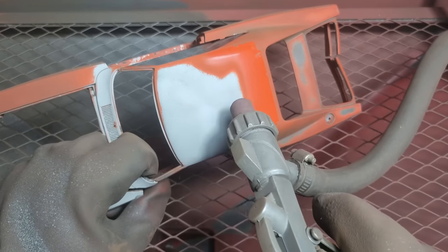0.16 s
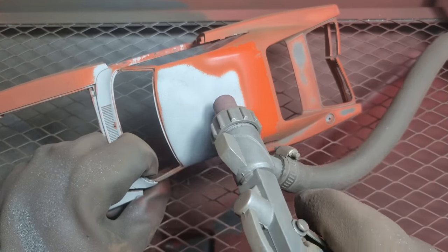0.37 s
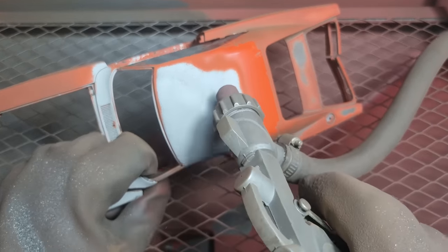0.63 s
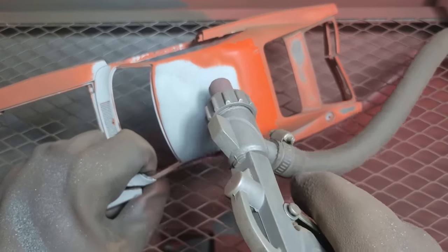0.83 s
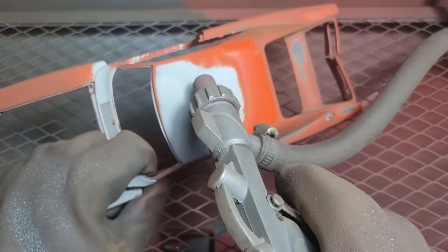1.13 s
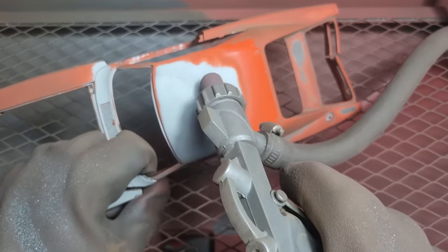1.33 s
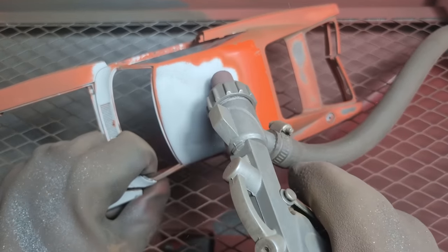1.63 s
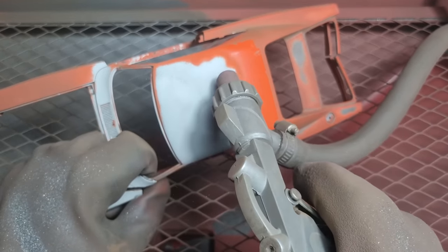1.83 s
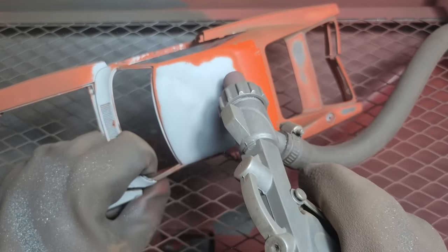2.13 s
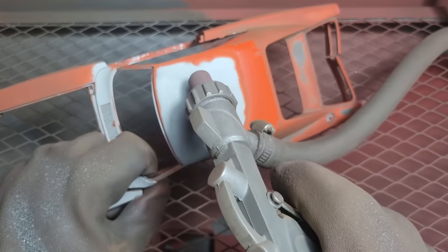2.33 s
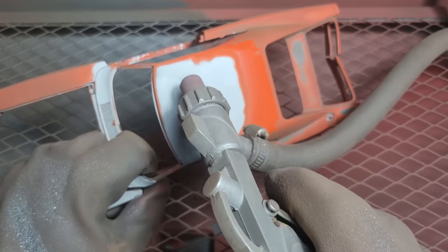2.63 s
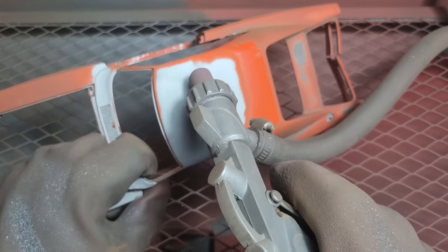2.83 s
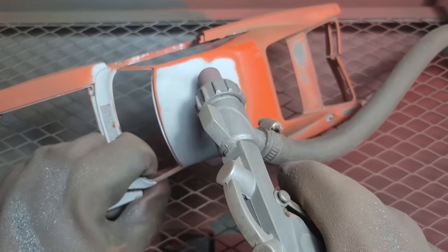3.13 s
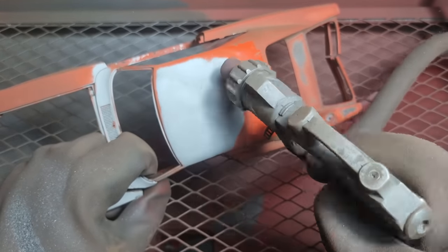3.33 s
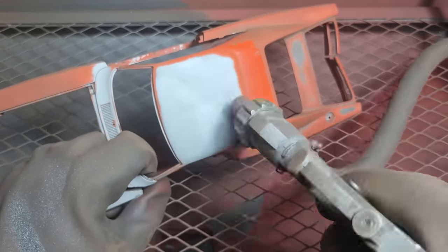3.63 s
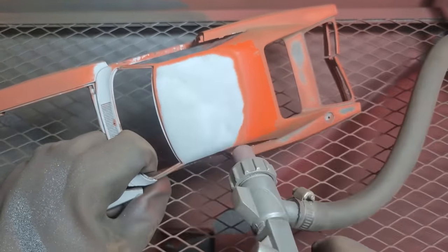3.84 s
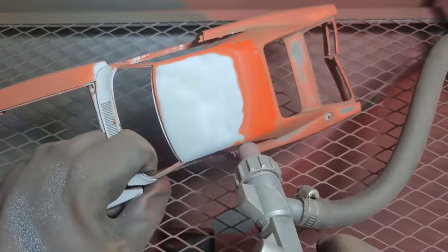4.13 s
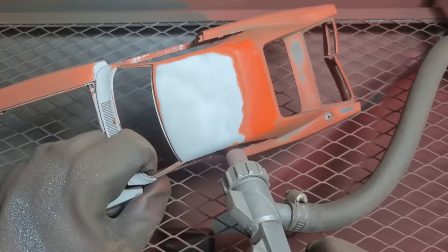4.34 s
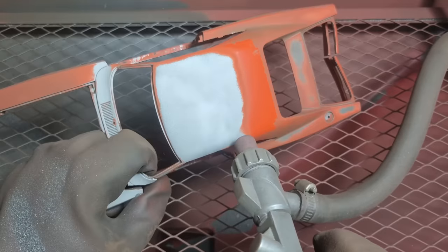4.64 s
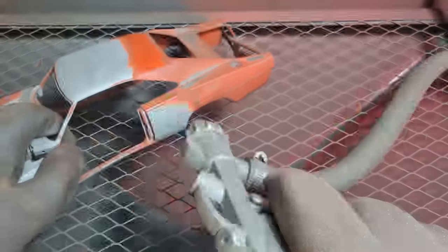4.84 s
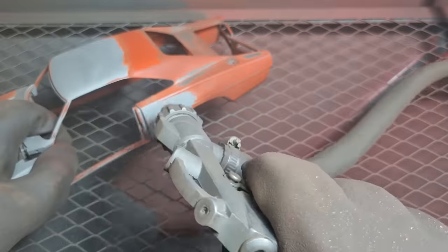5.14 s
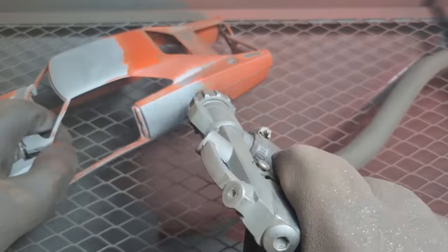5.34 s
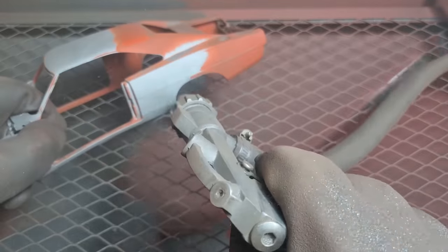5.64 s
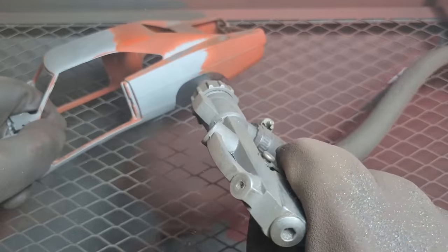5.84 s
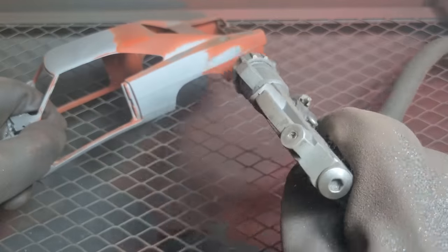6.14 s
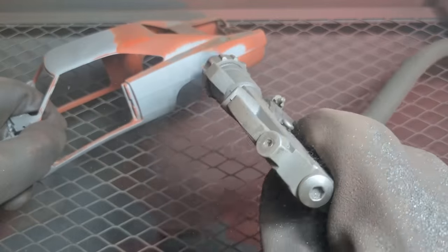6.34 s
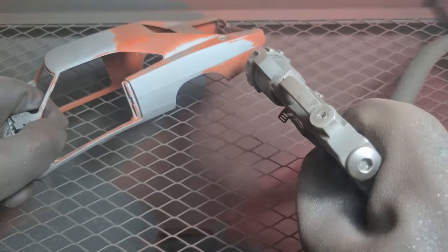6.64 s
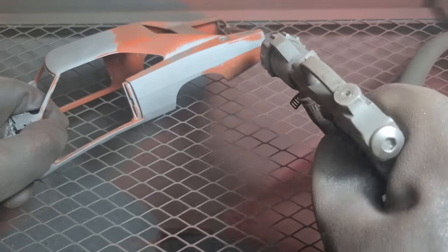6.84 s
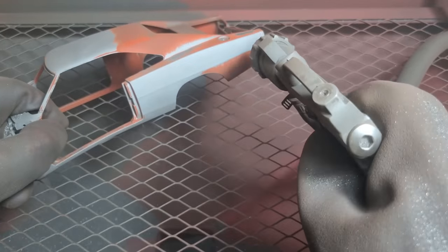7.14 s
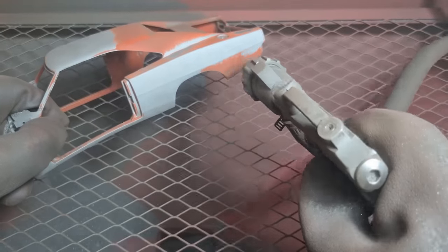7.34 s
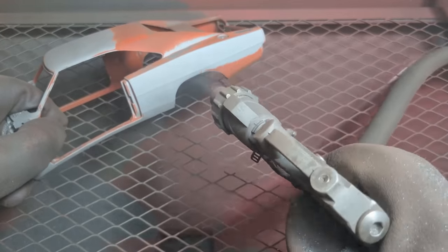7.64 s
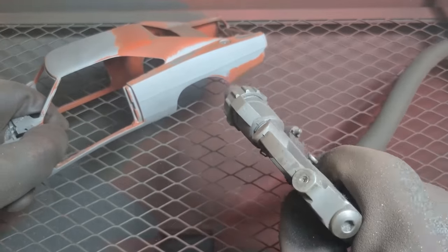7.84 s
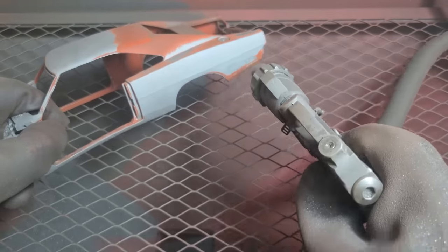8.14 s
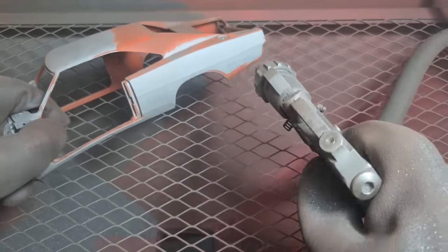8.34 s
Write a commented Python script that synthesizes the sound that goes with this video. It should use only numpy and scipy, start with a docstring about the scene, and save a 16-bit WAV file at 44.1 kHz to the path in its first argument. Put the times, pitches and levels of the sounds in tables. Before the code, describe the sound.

Steady sandblasting hiss and fine gritty fizz over a motor hum, dipping briefly midway and returning stronger, with faint whistles.

```python
"""A hiss over a humming fan and a throbbing compressor: a blast gun strips paint from a small metal shell
in a sandblasting cabinet, first its roof, then, after a brief lull, its flank. The turbulent jet excites
the resonances of the steel box, sings in the shell's hollows and whistles over edges, while grit impacts
merge into a fizz. The compressor runs through the first pass and again at the very end; its load makes
the fan's hum sag in pitch and level."""
import sys
import numpy as np
from scipy import signal
from scipy.fft import rfft, irfft
from scipy.io import wavfile
from scipy.ndimage import uniform_filter1d

SR = 44100
rng = np.random.default_rng(int(sys.argv[2]) if len(sys.argv) > 2 else 0)


def log_audio(samples):
    """Write samples as a 16-bit WAV file to the path given in sys.argv[1]."""
    # one column per channel
    frames = np.atleast_2d(samples).T
    # limit to full scale, then quantise
    limited = np.clip(frames, -1, 1)
    pcm = np.round(limited * 32767).astype(np.int16)
    wavfile.write(sys.argv[1], SR, pcm)


N = 373968
T = np.arange(N) / SR
HZ = np.fft.rfftfreq(N, 1 / SR)
LULL_START_S, PASS_CHANGE_S, LULL_END_S = 4.808, 4.835, 4.88
HISS_LULL_DB, HUM_LULL_DB, RUMBLE_LULL_DB = -11.5, -22, -15

# Coherence of the sound field. Each row: frequency in Hz, left-right likeness from 0 to 1.
COHERENCE = [(60, 0.92), (130, 0.89), (290, 0.9), (430, 0.71), (700, 0.054), (1400, 0.054), (3000, 0.28),
             (15000, 0.26)]
# Strength of the blast. Each row: time in seconds, relative jet level in dB, relative grit level in dB.
STREAM = [(0, -46.5, -57.5), (1.4, -46, -55), (2.2, -46.5, -56), (3.2, -46, -54.9), (4.15, -46, -55.5),
          (4.42, -44.5, -54), (4.58, -47.5, -56.5), (4.8, -47, -54.8), (4.95, -44, -51.5),
          (5.1, -45, -49.5), (6.3, -45.5, -49), (6.6, -44.5, -51), (7.45, -45, -50.5), (7.68, -45.5, -52),
          (7.95, -45, -51), (8.48, -44.5, -51)]
# Jet spectrum, one table a pass. Each row: frequency in Hz, relative spectral density in dB.
JET_COLOUR = [
    [(500, -14), (1100, -29), (1800, -16), (2800, -7), (4000, -3.5), (5200, -4), (6100, -6.5), (7000, -4.5),
     (7800, -5.5), (8600, -12), (10000, -29), (16000, -55)],
    [(500, -12.5), (1100, -13.5), (1550, -15.5), (2200, -9.5), (2600, -8), (4100, -1.5), (5200, -3.5),
     (6100, -7.5), (7000, -4), (7800, -10.5), (8600, -12.5), (10000, -56), (16000, -64)],
]
# Cabinet resonances in the hiss, one table a pass. Each row: frequency in Hz, width in Hz, gain in dB.
CABINET_MODES = [
    [(1612, 30, 15), (2190, 68, 10), (2870, 25, 6.5), (3380, 31, 5.5), (4100, 60, 5.5), (5390, 120, 2.5),
     (6470, 130, 3.5), (7870, 68, -3)],
    [(1340, 75, 11.5), (2070, 40, 8), (2960, 46, 5), (4030, 110, 1.5), (5270, 64, 5), (6440, 56, 8.5),
     (7800, 220, 3.5)],
]
# Direction of the hiss. Each row: frequency in Hz, multiplier of the jet's left-right level difference.
JET_SIDE = [(1000, 0), (2000, 0.5), (3500, 0.68), (5500, 1.37), (7600, 1.14), (8400, 0.33)]
# Spectrum of the grit impacts. Each row: frequency in Hz, relative spectral density in dB.
GRIT_COLOUR = [(2000, -42), (7000, 1.5), (9000, -2.5), (10800, -3), (12500, 0.5), (14000, -0.5), (15500, 2),
               (17000, -3)]
# The fan tone before any sag. Each row: time in seconds, frequency in Hz.
FAN_PITCH = [(5.53, 544.4), (5.6, 546.7), (7.4, 545.5)]
# Direction of the hum. Each row: time in seconds, left level over right in dB.
HUM_SIDE = [(0.0, -1.5), (0.54, 0.5), (2.76, -2.0), (2.83, 3), (4.75, 2.5), (5.05, 11.5), (5.86, 4.5),
            (7.56, 10), (7.63, 4.5), (8.22, 11), (8.27, -2), (8.31, 9), (8.48, 5.0)]
# Brief dips and swells of the hum. Each row: time in seconds, change in dB, half length in seconds.
HUM_SWELLS = [(2.74, -1.5, 0.065), (4.42, -2.5, 0.065), (4.89, 3.5, 0.013), (6.45, -1, .06),
              (7.68, -2.5, 0.095), (8.255, -3.5, 0.018)]
# Compressor runs. Each row: start and end in seconds, drive in dB, fan sag in Hz, hum drop in dB,
# level of the airy ring in dB.
COMPRESSOR_RUNS = [(-.1, 4.83, -41.7, 7.9, 10.2, -66), (8.235, 8.6, -39, 5.8, 5.5, -50.5)]
# Modes of the compressor's body and pipes. Each row: frequency in Hz, width in Hz, relative level in dB.
PIPE_MODES = [(76, 22, -13), (164, 17, -8), (245.7, 8, -0.5), (326.4, 24.5, -2.5), (395.6, 18.2, 1.5),
              (486, 48, -16), (726.5, 16, -5.5), (796, 59, -19.5)]
# Air rumbling in the box, one table a pass. Each row: frequency in Hz, relative spectral density in dB.
RUMBLE_COLOUR = [
    [(10, -14), (30, -11), (60, -14.5), (105, -16), (200, -7), (275, -1.5), (380, -11), (450, -9),
     (580, -5), (680, -6.5), (870, -13.5), (1200, -11), (2000, -11.5), (5000, -21)],
    [(10, -30), (30, -20), (60, -8), (105, -15.5), (200, -3.5), (300, 2), (380, -1.5), (450, -2.5),
     (580, 3.5), (680, -8.5), (900, -3.5), (1200, -8), (2000, -4.5), (5000, -25.5)],
]
# Box resonances in the rumble, one table a pass. Each row: frequency in Hz, width in Hz, gain in dB.
RUMBLE_MODES = [
    [(944, 65, 7), (1017, 43, 7), (1280, 110, 4), (1550, 61, -1.5), (1612, 28, 7.5)],
    [(300, 8.6, 6.5), (376, 22, 8.5), (738, 44, 6), (820, 79, 0.5), (1004, 27, 9.5), (1550, 180, -3.5)],
]
# Strength of the rumble. Each entry: level of one pass in dB.
RUMBLE_DB = [-47.5, -45]
# Notes of the shell's hollows. Each row: start and length in seconds, pitch in Hz, level in dB.
HOLLOWS = [(-.1, .36, 3760, -56), (.95, 2.3, 4680, -59.5), (1.3, .95, 3780, -58), (1.25, 1.05, 6500, -56),
           (2.5, 1.2, 6490, -58), (5.09, .11, 6650, -54), (5.36, .15, 7750, -53), (5.96, .1, 6640, -54),
           (6.28, .22, 7770, -54.5), (7.55, .22, 5150, -54), (7.95, .4, 2920, -57)]
# Dull handling bumps. Each row: start and length in seconds, centre in Hz, level in dB.
BUMPS = [(.21, .18, 58, -51), (1.19, .16, 80, -53), (5.06, .16, 90, -53), (5.07, .14, 175, -55),
         (5.46, .22, 125, -58), (5.6, .19, 80, -46), (5.86, .14, 110, -57), (7.01, .12, 70, -57)]
# Rushes of air. Each row: start and length in seconds, centre and nominal width in Hz, level in dB.
RUSHES = [(4.28, .22, 7900, 2200, -53), (4.9, .05, 4500, 2600, -51), (5.58, .15, 3800, 1700, -55),
          (5.78, .18, 4200, 2200, -54), (7.53, .28, 3800, 2200, -45.5)]
# Edge whistles. Each row: start and length in seconds, level in dB before the lull lowers it.
WHISTLES = [(4.849, 0.078, -49), (5.56, .09, -53), (5.653, 0.097, -50.5), (5.77, 0.087, -51.5),
            (5.86, 0.33, -54), (6.42, 0.15, -53), (6.76, .06, -58), (8.18, 0.097, -51)]
# Stutters of the grit feed. Each row: time in seconds, drop of the fizz in dB, half length in seconds.
STUTTERS = [(4.99, 4, .01), (5.21, 6, .013), (5.35, 5.5, .013), (5.5, 5, .011), (5.718, 7.5, .015),
            (5.933, 6, .012), (6.12, 5.5, .012), (6.3, 3.5, .01)]


def gain_of(db):
    """Amplitude ratio of a level in decibels."""
    return 10 ** (np.asarray(db) / 20)


def unit_rms(x):
    """The signal scaled to an rms of 1."""
    return x / np.sqrt(np.mean(x ** 2) + 1e-20)


def spectrum(points):
    """A curve interpolated on a log-frequency axis."""
    hz, value = np.transpose(points)
    return np.interp(np.log(HZ + 1), np.log(hz + 1), value)


def follow(rows):
    """The columns of a time curve, interpolated at every sample."""
    times, *columns = np.transpose(rows)
    return [np.interp(T, times, column) for column in columns]


def bell(centre, width):
    """Resonance curve: 1 at its centre and 3 dB down half a width to either side."""
    return 1 / (1 + ((HZ - centre) / (.78 * width)) ** 2)


def resonant_gain(colour, modes):
    """Source and filter: the decibels of the resonances add to those of the source spectrum."""
    return gain_of(spectrum(colour) + sum(db * bell(hz, width) for hz, width, db in modes))


def waver(rate_hz):
    """Low-pass random fluctuation with an rms of 1."""
    return unit_rms(irfft(rfft(rng.standard_normal(N)) * bell(0, rate_hz), N))


def air(echo_share=.55, echo_spread_hz=70):
    """Partly coherent left and right noise spectra: alike in the bass, scrambled by the walls above."""
    left, other = rfft(rng.standard_normal((2, N)))
    same = spectrum(COHERENCE)
    knots = np.arange(0, SR / 2 + echo_spread_hz, echo_spread_hz)
    phase = np.interp(HZ, knots, np.cumsum(rng.uniform(-np.pi, np.pi, len(knots))))
    reflected = echo_share * np.minimum(HZ / 1000, 1) ** 2
    other = reflected * left * np.exp(1j * phase) + np.sqrt(1 - reflected ** 2) * other
    return np.array([left, same * left + np.sqrt(1 - same ** 2) * other])


def coloured(spectra, gain):
    """Filtered stereo noise, scaled so that the mean of its two sides has an rms of 1."""
    x = irfft(spectra * gain, N)
    return x / x.mean(0).std()


def panned(db):
    """Left and right gains with a mean of 1, the left db above the right."""
    ratio = gain_of(db)
    return 2 * np.array([ratio, np.ones_like(ratio)]) / (1 + ratio)


def gate(start, end, attack, release):
    """A window from start to end with linear ramps inside it."""
    return np.clip(np.minimum((T - start) / attack, (end - T) / release), 0, 1)


def swell(start, length, edge=.28):
    """A window with raised-cosine ramps, each lasting the fraction edge of its length."""
    return np.sin(np.pi / 2 * gate(start, start + length, length * edge, length * edge)) ** 2


def blips(rows):
    """Brief Gaussian changes of level, in decibels."""
    return sum(db * np.exp(-((T - time) / half) ** 2) for time, db, half in rows)


def spectral_ripple(x, depth_db, flare_db, hold_frames=26):
    """Narrow random peaks and dips drift through the hiss and fizz; wider bands flare briefly."""
    frames = signal.stft(x, nperseg=2048)[2]  # axes: side, frequency, time
    narrow, wide = rng.standard_normal((2, *frames.shape))
    narrow = narrow + .35 * narrow[::-1]  # the two sides share part of the pattern
    narrow = uniform_filter1d(uniform_filter1d(narrow, size=2, axis=1), size=hold_frames, axis=2)
    narrow = uniform_filter1d(narrow, size=5, axis=2)
    wide = uniform_filter1d(uniform_filter1d(wide, size=9, axis=1), size=5, axis=2)
    field_db = depth_db * unit_rms(narrow) + flare_db * unit_rms(wide)
    rippled = signal.istft(frames * gain_of(field_db), nperseg=2048)[1][:, :N]
    return rippled * x.std() / rippled.std()


def jet(trim_db=-.2, side_db=6, flutter_db=.62, feed_share=.36):
    """Turbulence makes broadband noise that the cabinet filters; the shell's pose changes each pass."""
    noise, flow_db = air(), follow(STREAM)[0]
    sides = panned(side_db * spectrum(JET_SIDE))
    passes = [coloured(noise, sides * resonant_gain(colour, modes))
              for colour, modes in zip(JET_COLOUR, CABINET_MODES)]
    hiss = spectral_ripple(np.where(T < PASS_CHANGE_S, *passes), depth_db=3.2, flare_db=1)
    return hiss * gain_of(trim_db + flow_db + flutter_db * waver(5.3) + feed_share * feed_stutter())


def grit(trim_db=2.5, flutter_db=.6):
    """Superposition: countless impacts of grains on metal merge into a continuous fine fizz."""
    flow_db = follow(STREAM)[1]
    fizz = coloured(air(), gain_of(spectrum(GRIT_COLOUR)))
    fizz = spectral_ripple(fizz, depth_db=3.7, flare_db=1.5)
    return fizz * gain_of(trim_db + flow_db + flutter_db * waver(14) + feed_stutter())


def compressor_state(switch_s=.02):
    """Switching of the load: on (0 to 1), drive gain, fan sag in Hz, hum drop in dB, ring gain."""
    return sum(np.outer([1, gain_of(db), sag_hz, drop_db, gain_of(ring_db)],
                        gate(start, end, switch_s, switch_s))
               for start, end, db, sag_hz, drop_db, ring_db in COMPRESSOR_RUNS)


def fan_hum(level_db=-27.5, calm_shake=.024, load_shake=.034, drift_db=.3):
    """Rotation gives one tone; under the compressor's load it sags, weakens and shakes more."""
    on, _, sag_hz, drop_db, _ = compressor_state()
    hz = follow(FAN_PITCH)[0] - sag_hz + .2 * waver(1)
    db = level_db - drop_db + blips(HUM_SWELLS) + drift_db * waver(1.8)
    phase = 2 * np.pi * np.cumsum(hz) / SR
    lag = (.19 + .85 * on) * np.array([[0], [1]])  # radians by which the right side trails
    shake = (calm_shake + load_shake * on) * (waver(30) + 1j * waver(30))  # in amplitude and phase
    tone = np.sqrt(2) * ((1 + shake) * np.exp(1j * (phase - lag))).real
    interference = np.cos(lag[1] / 2)  # gain of the mean of two tones out of step
    return tone * panned(follow(HUM_SIDE)[0]) * gain_of(db) / interference


def compressor(stroke_hz=11.7, boom_hz=173, wander_hz=3.39, boom_db=-6, pipes_db=-2.5, ring_hz=1020):
    """Piston strokes modulate a booming note's amplitude; airflow excites pipe modes and an airy ring."""
    _, drive, _, _, ring_gain = compressor_state()
    strokes = np.cumsum(stroke_hz + .4 * waver(3)) / SR
    throb = 1 + .4 * np.cos(2 * np.pi * strokes) + .07 * waver(10)
    cycles = np.cumsum(boom_hz + wander_hz * waver(13.2)) / SR
    boom = unit_rms(throb * np.sin(2 * np.pi * cycles)) * gain_of(boom_db) * panned([-4])
    noise = air()
    pipe_power = sum((gain_of(db) * bell(hz, width)) ** 2 for hz, width, db in PIPE_MODES)
    pipes = coloured(noise, np.sqrt(pipe_power)) * gain_of(pipes_db) * panned([1])
    ring = coloured(noise, bell(ring_hz, width=175) ** 2)
    return (boom + pipes) * drive + ring * ring_gain


def box_rumble():
    """Swirling air drives the low resonances of the cabinet."""
    swirl = air()
    passes = [coloured(swirl, resonant_gain(colour, modes)) * gain_of(db)
              for colour, modes, db in zip(RUMBLE_COLOUR, RUMBLE_MODES, RUMBLE_DB)]
    return np.where(T < PASS_CHANGE_S, *passes)


def hollows(noise, sharpness=75, side_db=6):
    """Cavity resonance: each hollow of the shell picks a narrow band out of the jet's noise."""
    song = sum(coloured(noise, bell(hz, hz / sharpness) ** 2) * swell(start, length, edge=.19)
               * gain_of(db) for start, length, hz, db in HOLLOWS)
    return song * panned([side_db])


def bumps(width_hz=30):
    """Soft contact excites only low frequencies: gloved hands bump the cabinet."""
    noise = air()
    return sum(coloured(noise, bell(hz, width_hz)) * swell(start, length) * gain_of(db)
               for start, length, hz, db in BUMPS)


def rushes(noise, side_db=8.5):
    """Turbulence swells in a broad band as the jet slips off the shell."""
    rush = sum(coloured(noise, bell(hz, width) ** 2) * swell(start, length, edge=.14) * gain_of(db)
               for start, length, hz, width, db in RUSHES)
    return rush * panned([side_db])


def lull(depth_db):
    """Gain of the brief drop in level between the passes."""
    return 1 - (1 - gain_of(depth_db)) * gate(LULL_START_S, LULL_END_S, attack=.008, release=.03)


def hiss_return(return_s=4.902, rise_s=.015, held_db=-7.5):
    """The hiss drops out briefly with everything else and returns a moment after the hum."""
    held_low = gate(LULL_START_S, return_s + rise_s, rise_s, rise_s)
    return np.minimum(lull(HISS_LULL_DB), gain_of(held_db * held_low))


def whistles(pitch_hz=3820, width_hz=32, side_db=-10):
    """Edge tone: the jet oscillates across an edge and sounds one narrow band."""
    blow = sum(swell(start, length) * gain_of(db) for start, length, db in WHISTLES)
    return coloured(air(), bell(pitch_hz, width_hz)) * blow * panned([side_db])


def feed_stutter():
    """Fewer impacts radiate less power: the level change in dB as the grit supply stutters."""
    return -blips(STUTTERS)


def scene():
    """The blast adds to the machines; in the lull the hum sinks most and the hiss least."""
    stream = (jet() + grit()) * hiss_return()
    edge_tones = whistles()
    jet_noise = air()
    shell = (hollows(jet_noise) + rushes(jet_noise) + edge_tones) * lull(HISS_LULL_DB)
    hum = fan_hum() * lull(HUM_LULL_DB)
    rumble = (compressor() + box_rumble() + bumps()) * lull(RUMBLE_LULL_DB)
    return stream + shell + hum + rumble


def record(dry, cutoff_hz=15750):
    """A steep low-pass filter limits the bandwidth."""
    lowpass = signal.firwin(801, cutoff_hz, window=("kaiser", 9), fs=SR)
    return signal.oaconvolve(dry, lowpass[None], "same")


dry = scene()
out = record(dry)
log_audio(out)
```